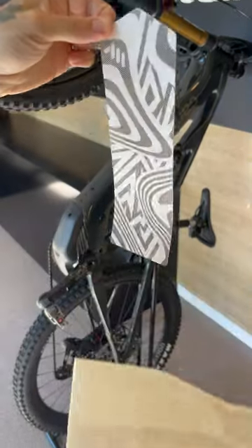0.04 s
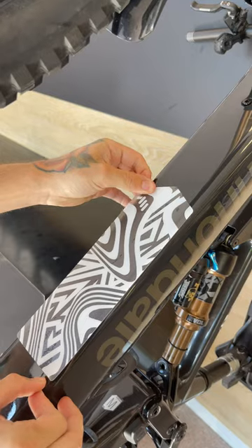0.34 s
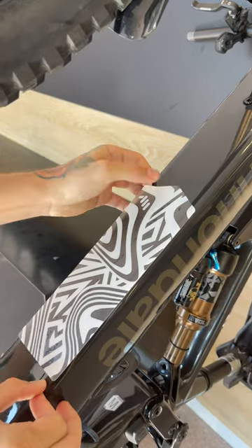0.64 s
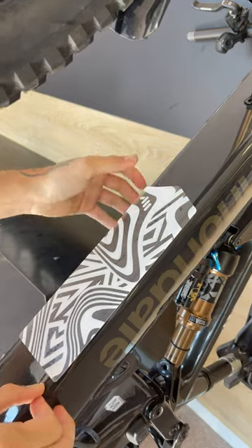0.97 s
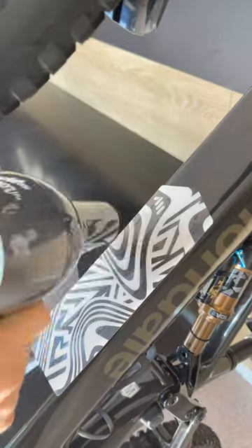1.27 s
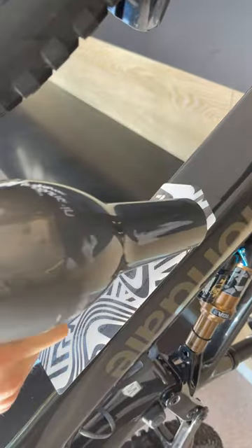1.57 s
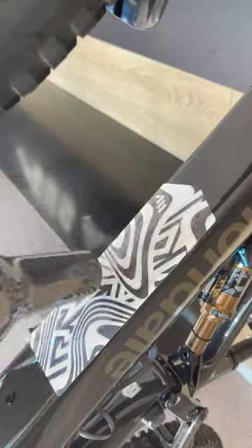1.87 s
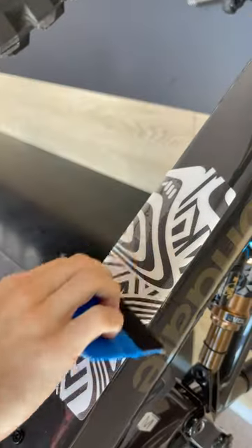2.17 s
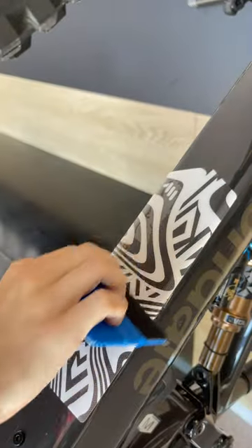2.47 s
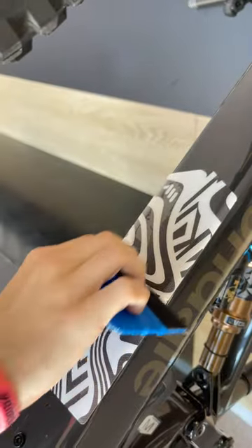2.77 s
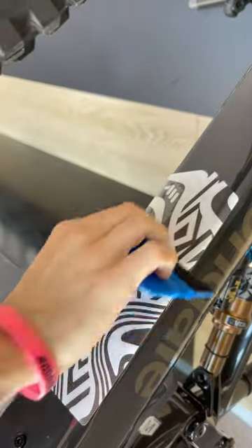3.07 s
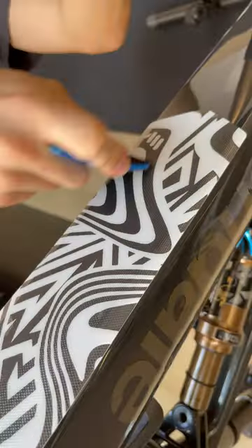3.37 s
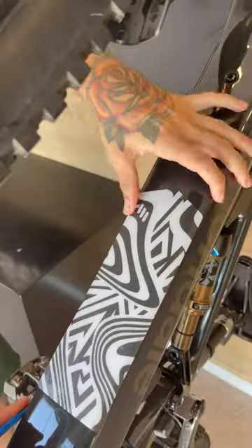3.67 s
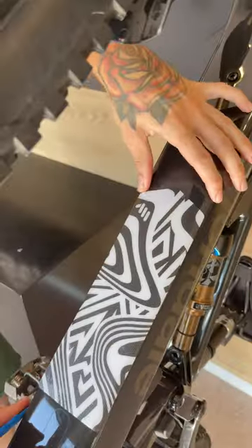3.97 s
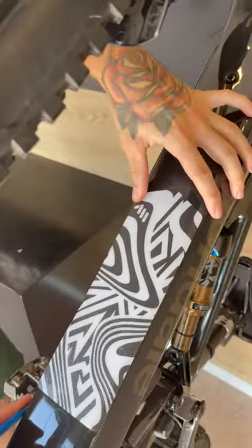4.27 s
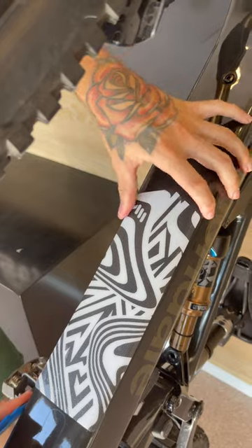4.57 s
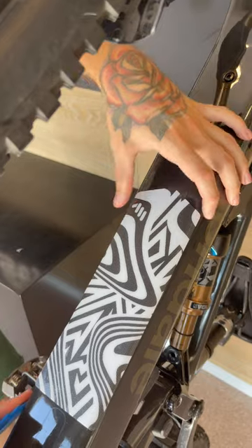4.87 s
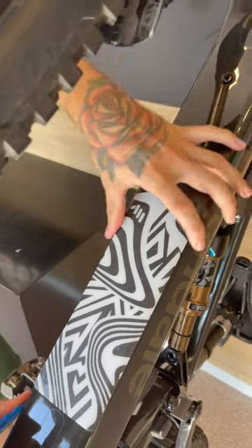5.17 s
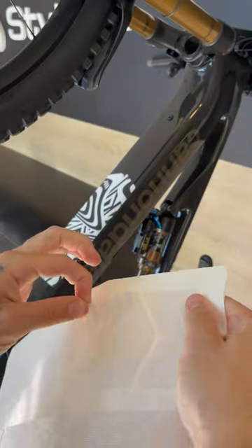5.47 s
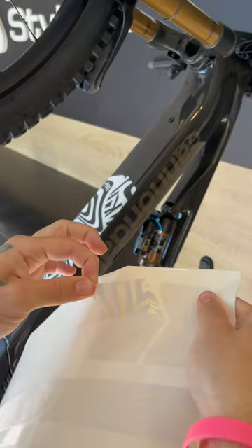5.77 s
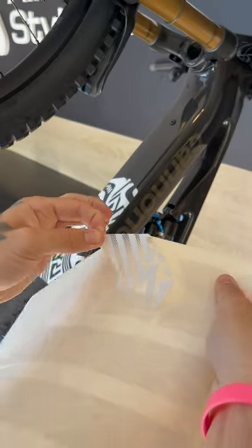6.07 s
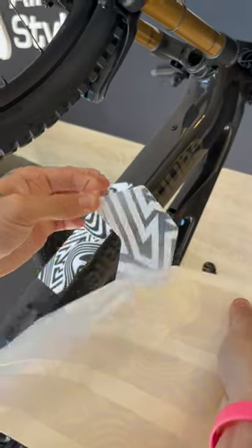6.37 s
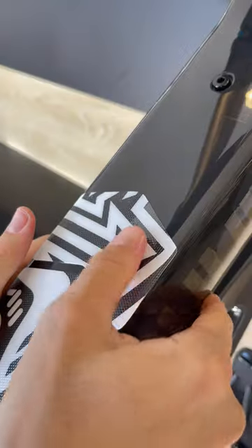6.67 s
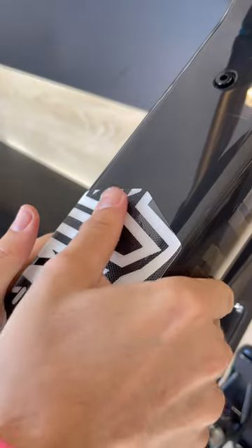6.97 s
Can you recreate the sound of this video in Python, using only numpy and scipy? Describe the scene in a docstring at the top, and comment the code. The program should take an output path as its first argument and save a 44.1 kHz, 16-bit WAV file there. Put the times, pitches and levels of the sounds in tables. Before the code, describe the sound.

Fingers softly brush and tick on adhesive film as it is laid on a bike frame. A hot-air blower cuts in loudly for about a second, roaring with a faint motor whine. A felt-edged squeegee then rubs quickly to and fro, making the hollow tube ring. After faint fingertip squeaks, film peels from backing paper with a fine crackle and snaps free. A machine hums low throughout, heard close up in a small workshop.

```python
"""A small workshop, close to a phone with two microphone ports: protective film goes onto a bike frame. A
machine hums throughout, and the background's level steps up and down at a few moments. Fingers brush the film,
which buckles and ticks as it is laid down. A blower's turbulent jet warms it, then a felt-edged squeegee rubs
it to and fro, and stick-slip friction excites the modes of the hollow tube. Last, threads of glue rupture as
the next piece is peeled off its backing paper and snaps free."""
import sys
import numpy as np
from scipy import signal
from scipy.fft import rfft, irfft, next_fast_len
from scipy.io import wavfile
from scipy.ndimage import uniform_filter1d, map_coordinates

SR = 44100
rng = np.random.default_rng(int(sys.argv[2]) if len(sys.argv) > 2 else 0)


def store_pcm(level_fs):
    """Save levels as 16-bit WAV."""
    pcm = np.round(np.clip(level_fs, -1, 1) * 32767).astype(np.int16)
    wavfile.write(sys.argv[1], SR, np.atleast_2d(pcm).T)


N = 310023
TIME = np.arange(N) / SR
SIZE = next_fast_len(N + SR // 2, real=True) // 2 * 2
FREQ = np.maximum(np.arange(SIZE // 2 + 1) * SR / SIZE, 1)


def undb(db):
    """Decibels to amplitude ratio."""
    return 10 ** (np.asarray(db) / 20)


def unit(x):
    """Normalisation to rms 1."""
    return x / np.sqrt(np.mean(x ** 2))


def over_hz(rows):
    """Interpolation of rows (frequency_hz, value) on a log-frequency axis."""
    hz, value = np.transpose(rows)
    return np.interp(np.log(FREQ), np.log(hz), value)


def through(x, response):
    """Linear filtering: the spectrum is multiplied by a frequency response."""
    return irfft(rfft(x, SIZE) * response, SIZE)[..., :N]


def colour(x, spectrum):
    """Minimum-phase filtering to a spectral shape; white noise keeps its power."""
    gain = unit(undb(over_hz(spectrum)))
    cepstrum = irfft(np.log(gain), SIZE)
    cepstrum[1:SIZE // 2] *= 2
    cepstrum[SIZE // 2 + 1:] = 0
    return through(x, np.exp(rfft(cepstrum)))


def resonate(x, modes):
    """Modal superposition: damped resonators (pitch_hz, bandwidth_hz, gain_db) in parallel."""
    responses = (undb(db) / (1 + 1j * (FREQ ** 2 - hz ** 2) / (FREQ * width)) for hz, width, db in modes)
    return through(x, sum(responses))


def wander(rate):
    """Smooth random fluctuation of rms 1, changing about rate times a second."""
    hold = max(int(SR / rate), 1)
    steps = np.repeat(rng.standard_normal(N // hold + 1), hold)[:N]
    return unit(uniform_filter1d(uniform_filter1d(steps, hold), hold))


def tone(hz, db, waver, rate):
    """Frequency modulation: a sine of rms level db whose pitch wanders by the fraction waver."""
    pitch_hz = hz * (1 + waver * wander(rate))
    return undb(db) * np.sqrt(2) * np.sin(2 * np.pi * np.cumsum(pitch_hz) / SR)


def detune(x, delay_s, rate):
    """Delay modulation: a slowly wandering delay bends all frequencies together."""
    return map_coordinates(x, [(TIME + delay_s * wander(rate)) * SR], order=3)


def grains(rate, spread_db):
    """Shot noise of rms 1: rate impulses a second; spread_db makes a few much larger."""
    size = undb(spread_db * np.minimum(rng.exponential(size=N), 4))
    return unit((rng.random(N) < rate / SR) * size * rng.standard_normal(N))


def swing(start, end, fastest=0.35):
    """Speed of a hand stroke from rest to rest, peaking at the fraction fastest of its length."""
    turn = start + np.clip(fastest, .05, .95) * (end - start)
    return np.sin(np.pi / 2 * np.interp(TIME, [start, turn, end], [0, 1, 0]))


# Phase lead of the left port over the right: frequency_hz, lead_rad
PORT_PHASE = [(300, 0), (800, 1.1), (1210, .1), (2300, .4), (3300, .4), (4100, 1.1), (4850, 3.1),
              (5300, 5.2), (8270, 8.8), (9700, 9.55), (11000, 11), (11900, 12.56)]
# Level of the left port over the right: frequency_hz, gain_db
PORT_BALANCE = [(60, -1), (200, -3), (360, -8.5), (650, -1.5), (1180, 4), (2140, 2), (3870, -1),
                (12700, -1)]
def ports(x, pan_db):
    """Diffraction: the phone's body delays and shades the direct sound at one port."""
    lead = undb((over_hz(PORT_BALANCE) + pan_db) / 2) * np.exp(.5j * over_hz(PORT_PHASE))
    return through(x, np.array([lead, 1 / lead]))


def room(x, t60, wet_db):
    """Reverberation: reflections off bench and walls, unlike at each port, fall 60 dB in t60 seconds."""
    t = TIME[:SR // 2]
    tail = rng.standard_normal((2, len(t))) * np.exp(-np.log(1000) * t / t60) * (t > .003)
    tail /= np.sqrt(np.sum(tail ** 2, axis=1, keepdims=True))
    return undb(wet_db) * through(x, rfft(tail, SIZE))


def held_levels(rows, blend_s):
    """Step functions: each level in rows (start_s, level_db, ..) holds, then ramps to the next."""
    starts, *columns = np.transpose(rows)
    step = np.searchsorted(starts, TIME, side="right") - 1
    return [uniform_filter1d(db[step], int(blend_s * SR)) for db in columns]


# Partials of the machine's hum: pitch_hz, relative_db
HUM_PARTIALS = [(76.3, -55), (153.1, -41.5), (306.2, -58.5), (612, -71)]
# Spectrum of the room's rumble: frequency_hz, relative_db
RUMBLE_SPECTRUM = [(15, -40.5), (35, -12), (55, -3.5), (75, 2.5), (115, -7.5), (190, -8.5), (260, -14.5),
                   (340, -17.5), (500, -27.5), (1000, -34.5), (2000, -48), (4500, -60.5), (9000, -57),
                   (13000, -71.5)]
# Steady stretches of the background: start_s, hum_gain_db, rumble_gain_db, drone_gain_db
BACKGROUND_STEPS = [(0, -12.5, -45, -55), (.204, -1.5, -46.5, -54), (1.064, -10.5, -49.5, -70.5),
                    (2.006, -1.5, -44, -52.5), (3.133, -3.5, -45, -62), (3.66, -1.5, -46, -53),
                    (5.338, -5, -46.5, -52), (6.555, 0, -47, -78)]
def workshop():
    """Diffuse-field coherence: under a machine's hum and a drone, rumble is alike only in the bass."""
    hum_db, rumble_db, drone_db = held_levels(BACKGROUND_STEPS, blend_s=.02)
    hum = sum(tone(hz, db + 0.59 * wander(5), waver=.003, rate=8) for hz, db in HUM_PARTIALS)
    drone = tone(hz=35.1, db=drone_db + 2 * wander(6), waver=0.087, rate=8.7)
    rumble = colour(rng.standard_normal((3, N)), RUMBLE_SPECTRUM) * undb(rumble_db)
    coherence = 1 / (1 + (FREQ / 900) ** 2)
    common = through(rumble[0], np.sqrt(coherence))
    diffuse = through(rumble[1:], 1.15 * np.sqrt(1 - coherence))
    return ports(common + hum * undb(hum_db) + drone, pan_db=-1.26) + diffuse


# Spectra of brushing skin and of the duller fingertip: frequency_hz, relative_db
SKIN_SPECTRUM = [(400, -3.5), (1200, -12), (2300, -1.5), (4500, -7), (6500, -4.5), (10300, 3.5),
                 (12500, -22)]
FINGERTIP_SPECTRUM = [(300, -7.5), (1200, -2.5), (2300, -1), (3500, -19), (12000, -34.5)]
# Finger strokes on the film: start_s, end_s, level_db, fingertip_relative_db
FINGER_STROKES = [(-.04, 0.057, -47.5, -18), (0.047, .13, -65.5, -10), (0.118, 0.19, -53.5, -20),
                  (0.457, 0.613, -76, -27), (0.54, 0.82, -59.5, -5.5), (0.977, 1.065, -75, 1),
                  (3.782, 3.922, -84.5, 10), (4.164, 4.203, -71.5, 7), (4.485, 4.542, -81.5, 8),
                  (4.663, 4.729, -60.5, -6.5), (4.717, 4.857, -72.5, -10.5), (4.92, 4.955, -71, -6),
                  (5.082, 5.265, -71.5, -3), (6.691, 6.722, -65, -8), (6.846, 6.881, -68.5, 4)]
# Fingertip squeaks: start_s, end_s, pitch_hz, level_db
FINGER_SQUEAKS = [(0.913, .945, 3060, -76.5), (4.66, 4.725, 2550, -67), (4.715, 4.835, 6150, -75),
                  (6.847, 6.874, 1785, -65)]
def fingers():
    """Sliding friction: skin brushes over the film and squeaks faintly where it grips."""
    touch = sum(undb(db) * swing(start, end) for start, end, db, _ in FINGER_STROKES)
    press = sum(undb(db + dull_db) * swing(start, end) for start, end, db, dull_db in FINGER_STROKES)
    squeaks = sum(tone(hz, db, waver=.04, rate=630) * swing(start, end)
                  for start, end, hz, db in FINGER_SQUEAKS)
    slips = grains(rate=3300, spread_db=2)
    sound = colour(slips * touch, SKIN_SPECTRUM) + colour(slips * press, FINGERTIP_SPECTRUM) + squeaks
    return ports(sound, pan_db=-0.5) + room(sound, t60=.2, wet_db=-16.5)


# Spectra of a sharp crack and of the sheet's body: frequency_hz, relative_db
CRACK_SPECTRUM = [(500, -25.5), (2400, -6), (4500, 0.5), (7000, 1.5), (10300, 1.5), (12500, -15)]
SHEET_SPECTRUM = [(150, -18), (450, -6.5), (850, 0), (1500, -3.5), (2400, -7.5), (4500, -21), (9000, -35.5)]
# Buckles of film and paper: start_s, crack_gain_db, body_relative_db, t60_s
BUCKLES = [(0.0155, -32.5, -9, 0.01), (.602, -25.5, 4, 0.028), (.6469, -39.5, 6.5, 0.024),
           (0.7274, -31, 3, 0.036), (1.343, -10, -18, 0.024), (3.1356, -26, -2.5, 0.022),
           (4.1708, -47, 5, .01), (5.4702, -27.5, -24, 0.018), (5.48, -43, -22, .008),
           (6.253, -35, -18.5, 0.0118), (6.265, -38, 0, .02), (6.2785, -13, -3.5, 0.011)]
def crinkles():
    """Snap-through buckling: a bright crack and, when a large patch flips, a papery knock and flutter."""
    crack, body = np.zeros((2, N))
    for start, db, body_db, t60 in BUCKLES:
        first = int(start * SR)
        age = TIME[:min(SR // 10, N - first)]
        burst = undb(db) * rng.standard_normal(len(age)) * np.exp(-np.log(1000) * age / t60)
        crack[first:first + len(age)] += burst
        body[first:first + len(age)] += 0.75 * undb(body_db) * burst
        body[first + SR // 1000] += undb(db + body_db + 14)  # the knock
    sound = undb(-7) * (colour(crack, CRACK_SPECTRUM) + colour(body, SHEET_SPECTRUM))
    reflections = room(sound, t60=.045, wet_db=-6.5) + room(sound, t60=0.24, wet_db=-13)
    return ports(sound, pan_db=0.0) + reflections


# Spectrum of a dry tick: frequency_hz, relative_db
DRY_TICK_SPECTRUM = [(300, 17), (2000, 0), (12000, -15.5)]
# Ticks that fall on some of the background's steps: start_s, impulse_db
DRY_TICKS = [(0.204, -26.5), (5.338, -25), (6.555, -23)]
def dry_ticks():
    """Impulse response of a broad filter: single ticks with no ring, the same at both ports."""
    impulses = np.zeros(N)
    for start, db in DRY_TICKS:
        impulses[int(start * SR)] += undb(db)
    return colour(impulses, DRY_TICK_SPECTRUM)


# Spectrum of a sticky tick: frequency_hz, relative_db
TACK_SPECTRUM = [(1000, -28), (4000, -16), (7500, -8), (10500, 11), (13000, -18.5)]
# Spots of glue letting go: start_s, relative_db
GLUE_RELEASES = [(.4499, -40.5), (0.498, -41.5), (.5237, -29.5), (.5716, -27.5), (.658, -34), (.6823, -36),
                 (4.7914, -48), (5.131, -54), (5.6887, -40), (5.734, -33), (5.967, -35)]
def sticky_ticks():
    """Adhesive failure: each spot of glue lets go in one high-pitched impulse."""
    impulses = np.zeros(N)
    for start, db in GLUE_RELEASES:
        impulses[int((start + .001) * SR)] += undb(db + 7)
    sound = colour(impulses, TACK_SPECTRUM)
    return ports(sound, pan_db=-1) + room(sound, t60=0.094, wet_db=-12)


BLOWER_ON_S, BLOWER_OFF_S = 1.0645, 2.006
# Spectrum of the hot-air jet: frequency_hz, relative_db
JET_SPECTRUM = [(30, -49.5), (60, -33.5), (160, -21.5), (400, -15.5), (470, -8.5), (530, 2), (620, 0),
                (780, -4), (1000, -11.5), (1400, -9), (1720, -13.5), (2100, -9), (3600, -17), (4900, -16),
                (6000, -19), (10000, -15), (11500, -18.5), (12900, -36)]
# Modes of the air gap between nozzle and frame: pitch_hz, bandwidth_hz, gain_db
GAP_MODES = [(1319, 330, 0.5), (780, 200, -1)]
# The gap's ring against the roar as the nozzle moves: time_s, relative_db
GAP_RING = [(1.064, -17), (1.15, -9), (1.38, -20), (1.58, -12), (1.72, -12), (1.92, -7)]
# Motor and fan tones: pitch_hz, relative_db
MOTOR_TONES = [(242.4, -43.5), (608, -40), (1208, -51.5), (1367, -44), (1426, -40.5), (1508, -47.5),
               (1994, -45), (2062, -47.5), (2313, -49), (2708, -52.5), (2855, -48), (3204, -55),
               (3897, -49), (5836, -51.5)]
def blower():
    """Turbulence: a jet roars against the frame and rings the gap under the nozzle; the motor whines."""
    starting = np.exp(-np.maximum(TIME - BLOWER_ON_S, 0) / 0.012)  # dies away as the jet builds up
    away = np.exp(np.minimum(TIME - BLOWER_OFF_S, 0) / .2)  # the nozzle withdraws: weaker and duller
    roar = colour(rng.standard_normal(N), JET_SPECTRUM) * undb(0.56 * wander(60))
    treble = through(roar, 1 / (1 + (2500 / FREQ) ** 4))
    treble_db = -0.06 - 3 * away + .6 * wander(12)
    gap = unit(resonate(resonate(rng.standard_normal(N), GAP_MODES), GAP_MODES))
    gap *= undb(np.interp(TIME, *np.transpose(GAP_RING)))
    jet = (roar + (undb(treble_db) - 1) * treble + gap) * undb(-21.5 - 3.5 * starting - 3 * away)
    whine = sum(tone(hz, db + 0.5, waver=.0045, rate=70) for hz, db in MOTOR_TONES)
    running = np.clip((TIME - BLOWER_ON_S) / 0.0011, 0, 1) * np.clip((BLOWER_OFF_S - TIME) / 0.0082, 0, 1)
    scattered = resonate(jet, [(3300, 2400, 0)])  # the frame scatters mostly the upper middle
    return running * (ports(jet + whine, pan_db=1.0) + room(scattered, t60=0.038, wet_db=-7.0))


# Squeegee rubs: start_s, length_s, level_db, place on the tube ("middle" or "end")
RUBS = [(1.911, .27, -34, "middle"), (2.186, .29, -34, "middle"), (2.474, 0.26, -33, "middle"),
        (2.74, .25, -36, "middle"), (2.997, 0.27, -36.5, "middle"), (3.09, .27, -36, "end"),
        (3.358, 0.24, -35, "end"), (3.605, 0.21, -36, "end")]
def rubbing(place, since, until):
    """Friction envelopes: force and hiss grow with speed through a firm push and a lighter return."""
    force, hiss = np.zeros((2, N))
    for start, length, db, where in RUBS:
        if where == place:
            turn = start + length / 2
            push = swing(start, turn, fastest=0.42)
            back = swing(turn, start + length, fastest=0.55)
            force += undb(db) * (push ** 1.21 + undb(-10) * back)
            hiss += undb(db) * (push ** 1.85 + undb(-8.5) * back ** 1.3)
    touching = np.clip(np.minimum(TIME - since, until - TIME) / .0045, 0, 1)
    return force * touching, hiss * touching


MOVE_TO_END_S, RUBBING_STOPS_S = 3.133, 3.66
# Modes of the tube, rubbed at its middle and at its end: pitch_hz, bandwidth_hz, gain_db
MIDDLE_MODES = [(761, 74, 1), (990, 120, -9.5), (1256, 76, -11), (1582, 71, -5), (2120, 85, -12),
                (2453, 65, -12.5), (2820, 52, -18), (3256, 140, -25.5), (3770, 27, -25)]
END_MODES = [(468, 28, 5), (845, 84, -10), (1038, 45, -7), (1590, 39, -20.5), (1926, 88, -17),
             (2280, 34, -11.5), (2400, 50, -17), (2600, 65, -11.5), (2940, 42, -21), (3410, 26, -21)]
# Spectra of the felt's scrape and of its fibres' hiss: frequency_hz, relative_db
SCRAPE_SPECTRUM = [(200, -4), (500, -5.5), (900, 0), (2600, -7.5), (4300, -21.5), (8000, -9),
                   (13000, -48.5)]
FIBRE_SPECTRUM = [(1500, -22), (3500, -11), (5000, -2), (6200, -3.5), (8000, 1), (10400, 6.5), (11500, -4),
                  (12900, -43)]
def squeegee():
    """Stick-slip friction: felt fibres catch and slip, driving the tube's modes and hissing themselves."""
    middle_force, middle_hiss = rubbing("middle", BLOWER_OFF_S - .005, MOVE_TO_END_S)
    end_force, end_hiss = rubbing("end", MOVE_TO_END_S, RUBBING_STOPS_S)
    hiss = undb(-3) * middle_hiss + undb(3) * end_hiss
    slips = grains(rate=6000, spread_db=0.0) * undb(1.3 * wander(70))
    # the pressing hand loads the tube differently as it moves
    middle_ring = detune(resonate(slips * middle_force, MIDDLE_MODES), delay_s=.0007, rate=12)
    end_ring = detune(resonate(slips * end_force, END_MODES), delay_s=.0005, rate=14)
    treble_rolloff = 1 / (1 + (FREQ / 9500) ** 8)  # dulls the tube's ring above 9.5 kHz
    tube = through(undb(20.0) * middle_ring + undb(21.0) * end_ring, treble_rolloff)
    scrape = undb(-8.5) * colour(slips * (middle_force + end_force), SCRAPE_SPECTRUM)
    fibres = undb(-6) * colour(grains(rate=11000, spread_db=2.5) * hiss, FIBRE_SPECTRUM)
    direct = ports(tube, pan_db=-2.0) + ports(scrape + fibres, pan_db=0.8)
    reflections = room(tube + scrape, t60=0.098, wet_db=-6) + room(fibres, t60=0.11, wet_db=-13.5)
    abrupt_stop = np.clip((RUBBING_STOPS_S - TIME) / 0.0036, 0, 1)
    return abrupt_stop * (direct + reflections)


# Spectrum of fine glue threads breaking: frequency_hz, relative_db
GLUE_SPECTRUM = [(600, -18), (1500, -10.5), (3200, -21), (4400, -15), (5600, -7), (7500, 0.5), (10300, 11),
                 (11500, -3), (12600, -29)]
# Modes of the backing paper: pitch_hz, bandwidth_hz, gain_db
BACKING_MODES = [(2050, 250, -14), (2760, 230, -25), (3550, 270, -20), (4800, 590, 4)]
# Pulls that lift the film: start_s, end_s, level_db, flex_relative_db, fastest_fraction
PEEL_PULLS = [(5.336, 5.462, -63, -22, 0), (5.46, 5.654, -54.5, -2, 0.07), (5.645, 5.905, -58, -18.5, 0.37),
              (5.835, 6.117, -56, -21, 0.65), (6.103, 6.405, -58.5, -3.5, 0.55)]
def peel():
    """Rupture under tension: glue threads snap in spurts at each pull; the flexing backing paper rings."""
    pull, flex = np.zeros((2, N))
    for start, end, db, flex_db, fastest in PEEL_PULLS:
        lift = undb(db) * swing(start, end, fastest)
        pull += lift
        flex += undb(flex_db) * lift
    threads = grains(rate=9000, spread_db=3.6) * undb(2.8 * wander(130) + .3)
    snaps = undb(-12.5) * grains(rate=260, spread_db=1.5)  # thicker threads break singly
    crackle = colour(threads * pull, GLUE_SPECTRUM) + colour(snaps * pull, CRACK_SPECTRUM)
    paper = undb(6.5) * resonate((threads + snaps) * flex, BACKING_MODES)
    sound = crackle + paper
    return ports(sound, pan_db=1.0) + room(sound, t60=0.096, wet_db=-28)


def scene():
    """Superposition: the pressures of all sources add at the two ports."""
    return blower() + squeegee() + peel() + fingers() + crinkles() + dry_ticks() + sticky_ticks() + workshop()


def record(dry):
    """Band limiting: the phone's steep low-pass filter cuts the treble above 13 kHz."""
    return signal.sosfilt(signal.ellip(10, .2, 80, 13000, fs=SR, output="sos"), dry)


dry = scene()
out = record(dry)
store_pcm(out)
```